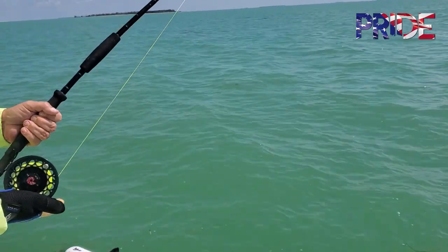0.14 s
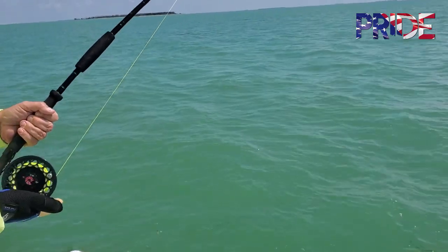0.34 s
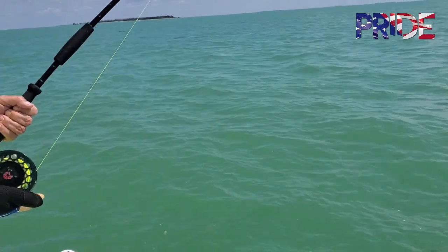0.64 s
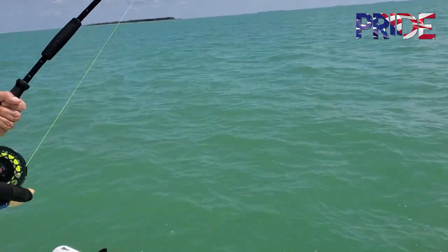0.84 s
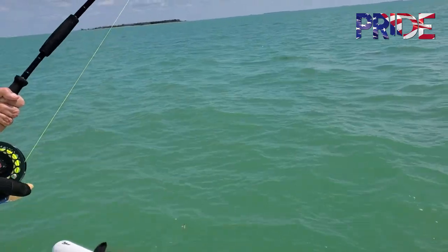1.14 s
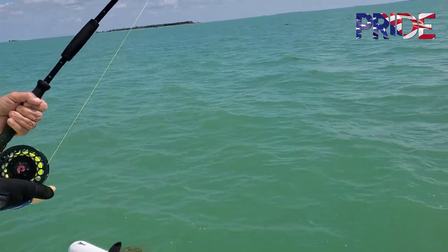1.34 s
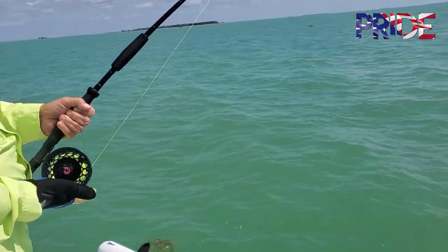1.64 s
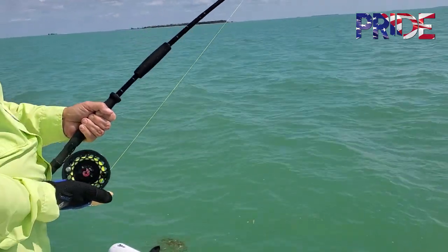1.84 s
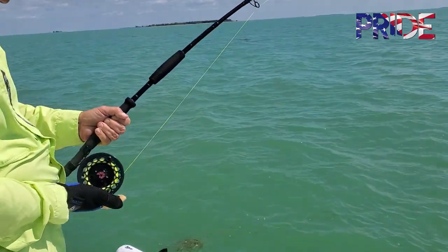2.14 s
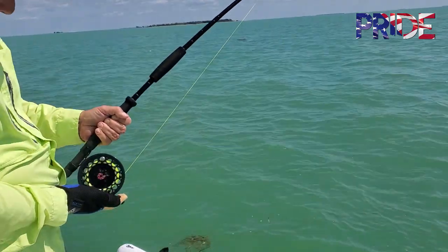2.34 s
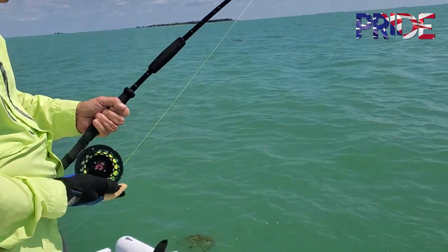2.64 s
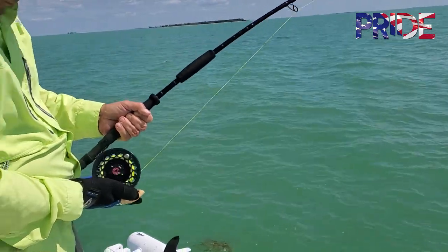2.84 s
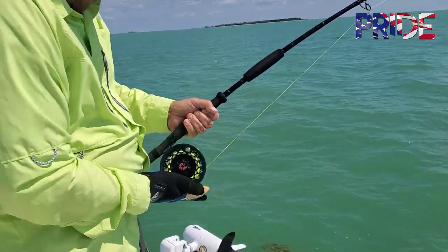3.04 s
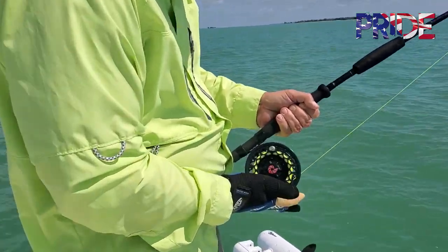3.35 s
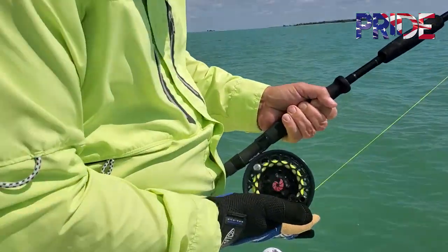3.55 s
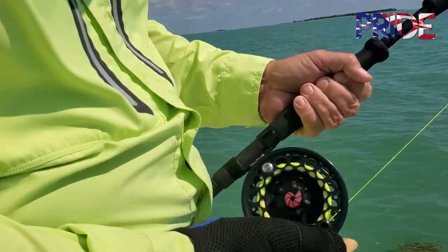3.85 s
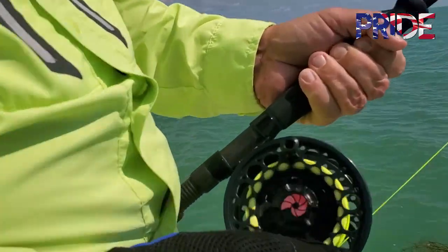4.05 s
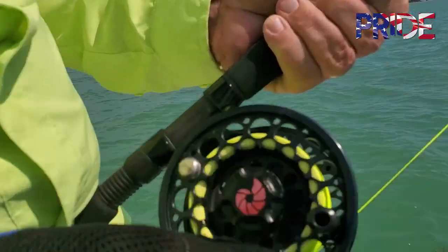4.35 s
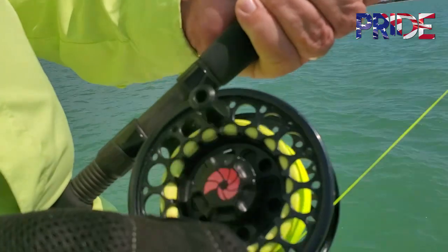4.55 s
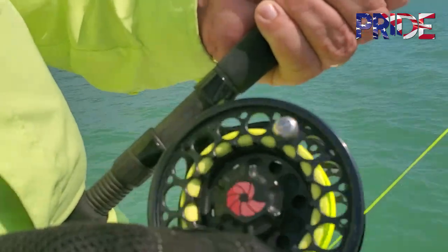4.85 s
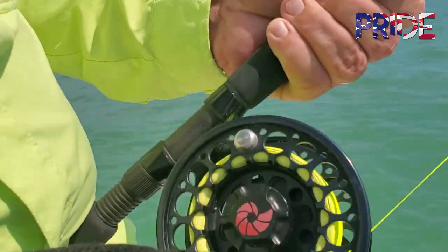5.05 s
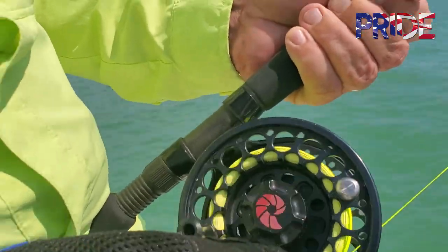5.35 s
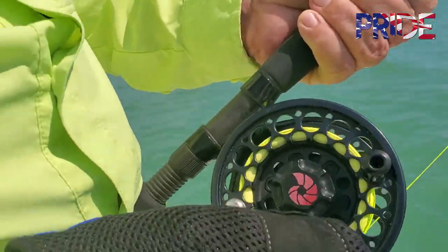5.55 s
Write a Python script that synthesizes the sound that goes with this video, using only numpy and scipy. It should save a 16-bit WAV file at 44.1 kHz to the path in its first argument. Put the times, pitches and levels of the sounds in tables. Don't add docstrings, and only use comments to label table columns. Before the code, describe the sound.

A fly reel's rapid metallic clicking surges and slackens as a fish pulls line, with hard gritty scuffs, whine and sea breeze.

```python
import sys
import numpy as np
from scipy import signal
from scipy.fft import rfft, irfft
from scipy.io import wavfile
from scipy.ndimage import uniform_filter1d

SR = 44100
rng = np.random.default_rng(int(sys.argv[2]) if len(sys.argv) > 2 else 0)


def persist_wave(psi):
    counts = np.round(np.clip(psi, -1, 1) * 32767).astype(np.int16)
    wavfile.write(sys.argv[1], SR, np.atleast_2d(counts).T)


def magnitude_from_level(level_db):
    exponent = np.asarray(level_db, float) / 20
    return 10 ** exponent


N = 251370
T = np.arange(N) / SR

# (frequency [Hz], level [dB per Hz])
SEA_SPECTRUM = [(300, 1.5), (500, 6), (900, -7), (1400, -6), (3000, 1.5), (5500, -13.5), (9000, -19),
                (15700, -15), (16500, -41)]
SEA_DB = -57
# (time [s], peak level [dB], pitch [Hz], splash share [0-1], decay by 60 dB [s])
HULL_SLAPS = [
    (0.125, -31.5, 574, 0.39, 0.11),
    (0.414, -39, 805, 0.15, 0.1),
    (0.696, -46, 472, 0.27, 0.13),
    (1.713, -28, 450, 0.13, 0.096),
    (1.72, -31.5, 658, 0.078, 0.075),
    (2.398, -54, 417, 0.073, 0.063),
    (3.845, -27.5, 399, 0.047, 0.06),
    (4.383, -37, 520, 0.1, 0.051),
    (5.477, -29, 561, 0.13, 0.077),
]

# (time [s], level [dB])
BREEZE = [(0, -73), (.6, -48), (1.3, -49), (2.1, -43), (2.8, -46), (3.6, -47.5), (4.4, -52), (5.7, -52.5)]
# (time [s], rumble level [dB], flutter level [dB], length [s])
GUSTS = [(0.18, -45.5, -43, 0.17), (0.462, -34, -45, 0.018), (0.69, -44, -53, 0.02),
         (0.888, -41.5, -64, 0.045), (1.146, -44.5, -50, 0.045), (1.529, -38, -50, 0.028),
         (1.703, -84.5, -37, 0.22), (2.043, -39, -52, 0.012), (2.258, -38, -31.5, 0.024),
         (2.417, -50, -33, 0.042), (2.585, -48.5, -41, 0.077), (2.943, -31, -35, 0.01),
         (3.24, -69, -45.5, 0.38), (3.763, -58, -37.5, 0.023), (3.86, -60, -44.5, 0.093),
         (3.994, -57, -83, 0.13), (4.137, -65, -43.5, 0.014), (4.552, -42, -57, 0.01),
         (5.098, -41.5, -65, 0.015), (5.394, -48, -58, 0.02), (5.467, -81, -37, 0.043),
         (5.59, -48, -78, 0.076)]
# (frequency [Hz], level [dB per Hz])
RUMBLE_SPECTRUM = [(12, -14), (20, -15.5), (64, 8.5), (212, -2), (260, -13), (340, -17), (570, -120)]
# (frequency [Hz], level [dB per Hz])
FLUTTER_SPECTRUM = [(120, 0), (200, 5.5), (300, 1), (450, -1), (700, -17.5), (1100, -30), (1800, -25)]
FLUTTER_DB, FLUTTER_SHARE = -58, 1.94

# (time [s], pitch [Hz], level [dB], length [s])
SQUEAKS = [
    (1.015, 2070, -51.5, 0.016),
    (1.238, 2430, -55, 0.026),
    (1.32, 2680, -39, .014),
    (2.8, 3560, -42, 0.009),
    (0.857, 2160, -63, 0.046),
    (1.186, 1194, -64, 0.026),
]

# (time [s], peak level [dB], length [s])
SCUFFS = [(1.718, -19, 0.009), (1.7905, -14, 0.012), (1.8543, -7, 0.0058), (2.519, -13.5, 0.0079),
          (2.6026, -18, 0.0076), (2.866, -12, 0.0074), (2.878, -20.5, 0.019), (2.9398, -9.5, 0.013),
          (2.947, -25, 0.0026), (3.0023, -5.5, 0.0045), (3.067, -6, 0.0038), (3.1355, -12.5, 0.0099),
          (3.2275, -11, 0.0028), (3.468, -15.5, 0.014), (3.5483, -7, 0.0055), (3.628, -11, 0.0054),
          (3.724, -8.5, 0.0053), (3.9884, -20, 0.0014), (4.114, -4, 0.0058), (4.2185, -3, 0.0045),
          (4.327, -7, 0.0079), (4.4632, -4, 0.0054), (4.472, -5.5, 0.0055), (4.649, -2.5, 0.0052),
          (4.8775, -2, 0.0028), (5.042, -2.5, 0.0043), (5.4115, -7.5, 0.0056), (5.421, -8.5, 0.0076),
          (5.525, -3.5, 0.0044), (5.5431, -8, 0.0038)]
# (time [s], peak level [dB])
SAME_LENGTH_SCUFFS = [(0.181, -26.5), (.208, -36), (0.408, -28), (0.642, -25.5), (0.914, -23.5), (1.222, -24.5),
                      (1.432, -30), (1.639, -15), (1.71, -13), (1.964, -23), (2.193, -22), (2.458, -15.5), (2.751, -22),
                      (3.245, -36), (3.362, -20.5), (3.374, -19), (3.582, -14.5), (3.839, -8), (5.5455, -19)]
SAME_LENGTH_S = 0.0063
# (time [s], level [dB])
NUDGES = [(1.906, -37), (1.959, -44), (2.02, -41), (2.09, -44), (2.141, -46), (2.237, -50), (2.277, -44),
          (2.32, -56), (2.363, -55), (2.413, -44), (2.67, -48), (2.831, -49), (3.203, -63), (3.421, -38)]
# (frequency [Hz], level [dB])
SCUFF_LEFT = [(1000, -10.5), (2300, 6), (4000, 1), (6000, -8.5), (7500, -2.5), (9000, -9), (13000, -13),
              (15800, 8), (16300, -48)]
# (frequency [Hz], level [dB])
SCUFF_RIGHT = [(1000, -16), (2300, 14), (4000, 4), (6000, 10), (7500, 15), (9000, 3.5), (11000, 15),
               (15700, -13), (16300, -62)]
KNOCK_DB, KNOCK_SHARE, KNOCK_DB_PER_MS, KNOCK_FADE_DB_PER_S = -36.5, 1, 1.22, -2.5
# (time [s], level [dB], width [ms])
TOOTH_STRIKES = [(1.6432, -41, 1.4), (1.713, -21, 1.1), (1.7195, -21, 1.0), (1.7204, -20.5, 2),
                 (1.7816, -19, 1.6), (1.795, -12.5, 2.7), (1.8, -29, 1.6), (1.809, -27, 1.5),
                 (1.8551, -14, 1.8), (1.861, -20, 0.94), (2.4675, -25.5, 1.5), (2.5203, -18, 1.8),
                 (2.5274, -26, 3.7), (2.605, -12, 1.2), (2.61, -26, 2.4), (2.618, -19, 1.5),
                 (2.7499, -35, 1.8), (2.869, -18, 2.2), (2.872, -33, 1.7), (2.883, -20, 8.2),
                 (2.9414, -15, 1.6), (2.946, -10.5, 3.1), (2.951, -8, 4.7), (2.9573, -12, 1.4),
                 (3.0043, -17, 2.3), (3.0662, -14, 1.8), (3.0729, -18, 3.1), (3.1377, -14.5, 1.2),
                 (3.143, -18, 2.7), (3.1828, -35, 1.1), (3.235, -33, 1.4), (3.2486, -18.5, 1.2),
                 (3.3617, -25, 2.6), (3.3805, -19, 2.3), (3.4707, -17.5, 2.5), (3.478, -20, 1.8),
                 (3.549, -15, 1.4), (3.5582, -16.5, 2.3), (3.5906, -35, 1.1), (3.6326, -16.5, 3.1),
                 (3.7242, -15.5, 1.6), (3.7316, -18.5, 2.1), (3.848, -25, 1.2), (3.9875, -14.5, 2.3),
                 (3.9908, -21.5, 5.6), (4.1186, -5.5, 1.9), (4.1214, -18, 1.2), (4.227, -12, 1.6),
                 (4.334, -12, 3.7), (4.4684, -5.5, 1.7), (4.4717, -15, 1.2), (4.474, -17, 2.9),
                 (4.4794, -28, 1.8), (4.6564, -17, 0.49), (5.0446, -8, 0.8), (5.415, -3, 1.3),
                 (5.416, -23, 1.2), (5.424, -3.5, 1.15), (5.5439, -4.5, 2.4), (5.549, -18, 1.4)]
# (frequency [Hz], level [dB])
STRIKE_RIGHT = [(1000, -22.5), (2300, -9.5), (4000, -15.5), (6000, 3), (7800, 10.5), (9000, 4), (11000, 14),
                (15700, -9), (16300, -53.5)]
STRIKE_DB, STRIKE_LEFT_DB = -4.5, -4.5
STRIKE_RISE, STRIKE_FALL = 0.65, 0.55

# (first click [s], last click [s])
RUNS = [
    (.052, 5.1895),
    (5.326, 5.71),
]
# (slack time [s], slack speed [teeth/s], peak time [s], peak speed [teeth/s])
PULLS = [(.06, 76, .2, 194), (.28, 155, .36, 199), (.5, 129, .6, 181), (.7, 120, .85, 179),
         (.99, 89, 1.3, 240), (1.46, 103, 1.92, 708), (2.03, 597, 2.29, 956), (2.73, 183, 3.02, 648),
         (3.3, 285, 3.54, 512), (3.95, 266, 4.22, 369), (4.71, 176, 5.05, 228), (5.25, 70, 5.425, 385),
         (5.62, 168, 5.7, 188)]
# (time [s], speed [teeth/s])
PALM = [(1.69, 525), (1.76, 560), (1.83, 578), (1.885, 690), (2.57, 559), (2.65, 251), (2.87, 510),
        (3.11, 555), (3.8, 312), (4.1, 343), (4.29, 348), (4.35, 331), (4.42, 283), (4.475, 272),
        (4.51, 243), (4.57, 194), (5.17, 74), (5.326, 75), (5.4, 345), (5.47, 330), (5.5, 300), (5.56, 225),
        (4.05, 300), (3.6, 482), (3.69, 415), (3.2, 388)]
TEETH = 40
THROB_DB, TWICE_DB = 5, 2.2

# (frequency [Hz], width [Hz], left level [dB], right level [dB])
FRAME_MODES = [(8083, 280, -2.5, 4), (7820, 230, -2, 2.5), (8700, 3500, -22, -22), (7360, 360, -20, -3.5),
               (6930, 430, -6, -10.5), (9944, 69, -24, -3), (10310, 120, -31, -8.5), (8660, 310, -18, -11),
               (9430, 300, -26, -14), (12700, 320, -15, -1.5), (12320, 170, -16, -8)]
# (frequency [Hz], width [Hz], left level [dB], right level [dB])
RIM_MODES = [(6570, 150, -1.5, -11), (6116, 176, 1, -5), (10884, 260, -9, -1), (11530, 200, -13, 5),
             (9980, 1500, -6, -5.5), (12570, 360, -9, -1.5), (12900, 640, -3, -3), (13800, 250, 0, -7.5),
             (14400, 700, -9, -15), (15000, 430, -1, -10), (15800, 500, -7, -8)]
# (frequency [Hz], width [Hz], left level [dB], right level [dB])
BODY_MODES = [(3575, 1400, 7.5, 6), (3520, 130, -0.5, 0), (4430, 212, -1.5, -1.5), (4560, 420, -5.5, -3.5),
              (5450, 160, -2, -9.5), (5600, 370, -10, -27), (6700, 130, -3, -13.5), (7050, 530, 0.5, -32),
              (5720, 130, -8, -6)]
# (frequency [Hz], width [Hz], left level [dB], right level [dB])
CAGE_MODES = [(2293, 34, 9, 6), (2070, 130, 0, -24), (1330, 1600, -3, -21)]
# (time [s], level [dB])
HUB_FREE = [(0, 0), (3.15, -1), (3.3, -6), (3.5, -4), (3.7, -8), (3.8, -2), (3.95, -8), (5.7, -9)]

WHINE_PER_TOOTH = 6.35
# (frequency [Hz], level [dB])
WHINE_PATH = [(1300, -46), (1750, -7), (2300, 1.5), (2750, 3), (3300, 5), (3800, 7.5), (6300, 3),
              (8000, -8)]
# (time [s], whine level [dB])
PORTS_FACING = [(1.5, -18), (1.7, -3), (1.83, -2), (1.9, -7), (2.03, -3), (2.5, -3), (2.58, -7), (2.7, -17),
                (2.85, -17), (2.92, -9), (3.0, -19), (3.1, -12), (3.16, -16), (3.21, -9), (3.3, -7),
                (3.4, -18), (3.56, -8), (3.64, -14), (3.7, -6), (3.78, -12), (3.85, -5), (4.02, -12),
                (4.1, 1.5), (4.36, 2), (4.41, -1), (4.5, 10), (4.7, -7), (5.4, -4), (5.455, 7), (5.52, -4),
                (5.7, -5)]
# (time [s], level [dB], length [s])
CHIRPS = [
    (4.595, -43, 0.042),
    (4.82, -43, .028),
    (5.01, -49, 0.05),
    (5.655, -48, 0.039),
]

# (time [s], reel level [dB], facing towards the frame side [dB])
NEARNESS = [(.06, -49.5, -3), (.27, -47.5, -3), (1.07, -47.5, -6), (1.28, -48.5, -1.5), (1.5, -45.5, -2),
            (1.76, -47.5, -2), (2.44, -45.5, -4.5), (2.63, -46.5, 1.5), (2.8, -47.5, -0.5),
            (3.04, -48.5, 2), (3.29, -47, 2.5), (4.3, -35, -1), (4.58, -36.5, -1.5), (5.15, -35.5, -0.5),
            (5.26, -37.5, -5), (5.36, -36.5, -0.5), (5.47, -36.5, 0), (5.7, -38.5, 0)]
# (time [s], left over right [dB])
PAN = [(.05, -14.5), (1, -5.5), (1.7, -7), (3.2, -3), (4.3, -4), (5.7, -4)]
MID_DB, MID_SPEED = -45, 300
# (level [dB], share of nearness [dB/dB], share of facing [dB/dB], growth [dB per doubling of speed])
FRAME_LAW = (-51, 1.66, 1.18, 4)
RIM_LAW = (-49, 1.3573, -0.75, 3)
BODY_LAW = (-47.5, 1, 0.42, 4)
CAGE_LAW = (-65, 1.66, 3, 0)
WHINE_LAW = (-47, 0.71, 1.65, 6)
HUB_LAW = (-56.5, 1.5, 1.9, 3.5)

# (frequency [Hz], level [dB])
LEFT_DIP = [(7800, 0), (8800, -7), (10800, -7), (11600, 0)]
# (frequency [Hz], level [dB])
SUM_ASIDE = [(1150, 0), (1700, -6), (2050, -2), (2480, 0), (2600, -26), (3080, -26), (3280, -2), (3900, 0)]
# (frequency [Hz], level [dB])
DIFFERENCE = [(350, 0), (800, -2.5), (1600, 2), (2300, -3.5), (2650, -1), (2950, -7), (3350, 0)]


def evened(x):
    return x / np.sqrt(np.mean(x ** 2) + 1e-20)


def read(points, hz):
    f, value = np.transpose(points)
    return np.interp(np.log(hz + 1), np.log(f + 1), value)


def columns(rows):
    s, *rest = np.transpose(rows)
    return [np.interp(T, s, column) for column in rest]


def coloured(x, spectrum):
    gain = magnitude_from_level(read(spectrum, np.fft.rfftfreq(N, 1 / SR)))
    return irfft(rfft(x) * gain, N)


def lumps(size):
    once = uniform_filter1d(rng.standard_normal((2, N)), size)
    return evened(uniform_filter1d(once, size))


def bell(s, length):
    return np.exp(-((T - s) / length) ** 2)


def resonate(x, hz, width):
    turn = np.exp(2j * np.pi * np.cumsum(hz * np.ones(N)) / SR)
    r = np.exp(-np.pi * width / SR)
    smooth = signal.lfilter([1 - r], [1, -r], x / turn + 1e-18)
    return 2 * (turn * smooth).real


def ring(drive, modes, rise_s=0.000079):
    t, taps = T[:2000], np.zeros((2, 2000))
    for k, (hz, width, *db) in enumerate(sorted(modes)):
        phase = np.pi * (k + np.c_[[0, .5]])
        decay = np.sqrt(width) * np.exp(-np.pi * width * t)
        taps += magnitude_from_level(np.c_[db]) * decay * np.sin(2 * np.pi * hz * t + phase)
    taps *= (1 - np.exp(-t / rise_s)) ** 2
    out = signal.oaconvolve(drive, taps, axes=1)[:, :N]
    return out / np.std(out.mean(0))


def shifting(x, patchy_db=5.5, fleck_db=3.5):
    z = signal.stft(x, nperseg=512, noverlap=384)[2]
    broad, fine = rng.standard_normal((2, *z.shape))
    broad = evened(uniform_filter1d(uniform_filter1d(broad, size=5, axis=1), size=60, axis=2))
    fine = evened(uniform_filter1d(uniform_filter1d(fine, size=4, axis=1), size=16, axis=2))
    gain = evened(magnitude_from_level(patchy_db * broad + fleck_db * fine))
    return signal.istft(z * gain, nperseg=512, noverlap=384)[1][:, :N]


def water():
    sea = evened(coloured(rng.standard_normal((2, N)), SEA_SPECTRUM))
    wash = magnitude_from_level(SEA_DB + 2) * shifting(sea, patchy_db=3, fleck_db=3.5)
    splash_spectrum = [(150, 9), (350, 21), (900, 14.5), (2000, 2), (6000, 3), (12000, -16)]
    splash = evened(coloured(rng.standard_normal(N), splash_spectrum))
    slaps = np.zeros(N)
    for s, db, hz, share, t60 in HULL_SLAPS:
        u = np.clip(T - s, 0, None)
        note = np.sin(2 * np.pi * hz * u * (1 + 1.16 * u))
        lasting_splash = splash * magnitude_from_level(45 * u / t60)
        envelope = magnitude_from_level(db - 60 * u / t60) * (1 - np.exp(-u / 0.00042))
        slaps += envelope * ((1 - share) * note + share * lasting_splash)
    return wash + slaps * magnitude_from_level([[1.5], [-1.5]])


def buffets():
    breeze_db = columns(BREEZE)[0]
    rumble = magnitude_from_level(breeze_db)
    flutter = magnitude_from_level(FLUTTER_DB + FLUTTER_SHARE * (breeze_db + 51.5))
    for s, rumble_db, flutter_db, length in GUSTS:
        gust = bell(s, length)
        rumble = rumble + magnitude_from_level(rumble_db) * gust
        flutter = flutter + magnitude_from_level(flutter_db) * gust
    return rumble, flutter


def wind():
    rumble_gain, flutter_gain = buffets()
    low, high = rng.standard_normal((2, 2, N))
    rumble = evened(coloured(low, RUMBLE_SPECTRUM) * magnitude_from_level(1.95 * lumps(size=1200)))
    high = high + 0.057 * high[::-1]
    flutter = evened(coloured(high, FLUTTER_SPECTRUM) * magnitude_from_level(4.97 * lumps(size=350)))
    return rumble_gain * rumble + magnitude_from_level(-3.5) * flutter_gain * flutter * magnitude_from_level([[.7], [-.7]])


def squeaks():
    return sum(magnitude_from_level(db) * bell(s, length) * np.sin(2 * np.pi * hz * T) for s, hz, db, length in SQUEAKS)


def tooth_strikes(noise):
    push = np.zeros(N)
    u = np.arange(-200, 600) / SR * 1000
    for s, db, ms in TOOTH_STRIKES:
        at = round(s * SR)
        rise, fall = -(u / (STRIKE_RISE * ms)) ** 2, -u / (STRIKE_FALL * ms)
        push[at - 200:at + 600] += magnitude_from_level(db) * np.exp(np.where(u < 0, rise, fall))
    left = evened(coloured(noise[0], SCUFF_LEFT))
    right = evened(coloured(noise[1], STRIKE_RIGHT))
    return magnitude_from_level(STRIKE_DB) * push * np.array([magnitude_from_level(STRIKE_LEFT_DB - 7) * left, right])


def scuffs(contact, grit_db=3.5, rise_s=.002):
    scrape, knock = np.zeros(N), np.zeros(N)
    u = T[:2000]
    same_length = [(s, db, SAME_LENGTH_S) for s, db in SAME_LENGTH_SCUFFS]
    for s, db, length in [*SCUFFS, *same_length]:
        at = slice(round(s * SR), round(s * SR) + 2000)
        rise = (1 - np.exp(-u / (rise_s + 0.18 * length))) ** 2
        shape = rise * np.exp(-(u / (1.82 * length)) ** 2)
        scrape[at] += magnitude_from_level(db) * shape
        knock_db = KNOCK_DB + KNOCK_SHARE * (db + 12)
        knock_db += KNOCK_DB_PER_MS * 1000 * length + KNOCK_FADE_DB_PER_S * s
        knock[at] += magnitude_from_level(knock_db) * shape
    for s, db in NUDGES:
        knock[round(s * SR):][:2000] += magnitude_from_level(db) * np.exp(-((u - .006) / 0.005) ** 2)
    grit = evened(magnitude_from_level(grit_db * lumps(size=16)[0]))
    grit *= 0.56 + 0.27 * np.minimum(contact, 1.6)
    noise = rng.standard_normal((2, N))
    noise += .5 * noise[::-1]
    tone = np.array([coloured(noise[0], SCUFF_LEFT), coloured(noise[1], SCUFF_RIGHT)])
    rasp = magnitude_from_level(-12) * scrape * grit * tone / tone[1].std()
    thud = magnitude_from_level(21.5) * resonate(knock * evened(rng.standard_normal(N)), 2313, 42)
    ringing = magnitude_from_level(-24) * scrape.std() * ring(scrape * grit * noise, FRAME_MODES + RIM_MODES)
    return tooth_strikes(noise[:, ::-1]) + ringing + rasp + thud


def spool_speed():
    pulls = map(tuple, np.reshape(PULLS, (-1, 2)))
    s, v = np.transpose(sorted([*pulls, *PALM]))
    step = np.diff(v) / np.diff(s)
    a, b = step[:-1], step[1:]
    slope = np.r_[0, np.where(a * b > 0, 2 * a * b / (a + b + 1e-9), 0), 0]
    k = np.clip(np.searchsorted(s, T) - 1, 0, len(s) - 2)
    span = s[k + 1] - s[k]
    u = np.clip((T - s[k]) / span, 0, 1)
    glide = v[k] + (v[k + 1] - v[k]) * u * u * (3 - 2 * u)
    return glide + span * u * (1 - u) * (slope[k] * (1 - u) - slope[k + 1] * u)


def pawl(speed, climb_s=0.0021, chatter_s=0.0007, tooth_db=0.5):
    teeth, snaps = np.zeros(N), np.zeros(N + 1)
    worn_db = tooth_db * rng.standard_normal(TEETH)
    for start, stop in RUNS:
        on = (T >= start) & (T < stop)
        teeth[on] = np.cumsum(speed[on]) / SR
        teeth[on] += (-teeth[on][-1] % 1 + 1e-6) * (stop < T[-1])
        count = np.arange(int(teeth[on][-1]) + 1)
        wobble = .004 * rng.standard_normal(4000)[count]
        at = np.interp(count + wobble, teeth[on], T[on]) * SR
        whole, part = at.astype(int), at % 1
        size_db = worn_db[count % TEETH] + tooth_db * rng.standard_normal(4000)[count]
        size = magnitude_from_level(size_db) / np.sqrt(speed[whole])
        snaps[whole] += size * (1 - part)
        snaps[whole + 1] += size * part
    snaps = snaps[:N]
    u = np.arange(-300, 301) / SR
    contact = signal.oaconvolve(snaps, np.exp(np.minimum(u / climb_s, -u / chatter_s)), "same")
    contact = contact / np.sqrt(uniform_filter1d(contact ** 2, size=1500) + 1e-9)
    return evened(snaps), contact, teeth


def part_levels(speed):
    near_db, facing_db = columns(NEARNESS)
    controls = np.array([np.ones(N), near_db - MID_DB, facing_db, np.log2(speed / MID_SPEED)])
    return np.array([FRAME_LAW, RIM_LAW, BODY_LAW, CAGE_LAW, WHINE_LAW, HUB_LAW]) @ controls


def clicks(levels, snaps, contact, teeth, turning):
    frame_db, rim_db, body_db, cage_db, _, hub_db = levels
    scratch, rub = rng.standard_normal((2, 2, N))
    bright = np.c_[[.55, .95]] * snaps + .65 * contact * scratch + .25 * turning * rub[::-1]
    dull = 0.45 * snaps + .6 * contact * scratch + 0.7 * turning * rub
    turns = teeth / TEETH
    throb_db = THROB_DB * np.cos(2 * np.pi * (turns + 0.35))
    twice_db = TWICE_DB * np.cos(4 * np.pi * (turns + 0.38))
    out = magnitude_from_level(frame_db + 1.5 + twice_db) * ring(bright, FRAME_MODES)
    out += magnitude_from_level(rim_db) * ring(bright, RIM_MODES)
    out += magnitude_from_level(body_db - 1.5) * ring(dull, BODY_MODES)
    out += magnitude_from_level(cage_db) * ring(dull, CAGE_MODES[1:])
    out += magnitude_from_level(hub_db + throb_db + columns(HUB_FREE)[0]) * ring(dull, CAGE_MODES[:1])
    return shifting(out, patchy_db=2, fleck_db=2.8)


def port_whine(whine_db, speed, contact, turning):
    air = rng.standard_normal((2, N)) * (1.5 + contact)
    air += 0.17 * air[0]
    hz = WHINE_PER_TOOTH * speed
    whine = evened(np.array([resonate(resonate(a, hz, 120), hz, 160) for a in air]))
    whine_db = whine_db + columns(PORTS_FACING)[0] + 2.5 * lumps(size=700)
    octave = evened(resonate(resonate(air[0], 2 * hz, 55), 2 * hz, 55))
    octave = coloured(octave, [(1900, -6), (2330, 0), (2600, -2), (3100, 4)])
    chirp_gain = sum(magnitude_from_level(db) * bell(s, length) for s, db, length in CHIRPS)
    return magnitude_from_level(whine_db) * turning * coloured(whine, WHINE_PATH) + chirp_gain * octave


def reel(speed, snaps, contact, teeth):
    levels = part_levels(speed)
    turning = uniform_filter1d(1. * (teeth > 0), size=300) * np.minimum(speed / 200, 1)
    out = clicks(levels, snaps, contact, teeth, turning)
    out = out + port_whine(levels[4], speed, contact, turning)
    out = coloured(out, [(500, -5.5), (1000, -1.5)])
    return out * magnitude_from_level(np.outer([.5, -.5], columns(PAN)[0] - 0.5))


def scene():
    speed = spool_speed()
    snaps, contact, teeth = pawl(speed)
    background = water() + wind() + squeaks()
    return background + scuffs(contact) + reel(speed, snaps, contact, teeth)


def roll_off(x):
    return signal.sosfilt(signal.butter(12, 15800, fs=SR, output="sos"), x)


def record(dry):
    aside = np.interp(T, [.3, .9, 2.85, 3.1], [0.37, 0.9, 0.95, 0.35])
    both = (dry[0] + dry[1]) / 2
    apart = coloured((dry[0] - dry[1]) / 2, DIFFERENCE)
    both = both + aside * (coloured(both, SUM_ASIDE) - both)
    heard = np.array([coloured(both + apart, LEFT_DIP), both - apart])
    ceiling = .9
    limited = ceiling * np.tanh(heard / ceiling)
    finished = coloured(limited, [(15750, 0), (15900, -28), (16600, -50)])
    return roll_off(finished)


dry = scene()
out = record(dry)
persist_wave(out)
```